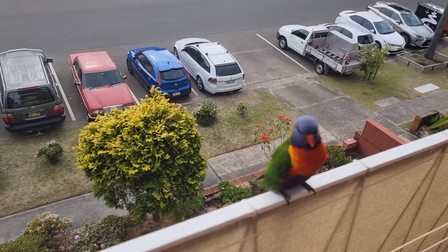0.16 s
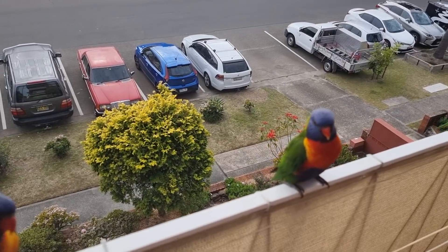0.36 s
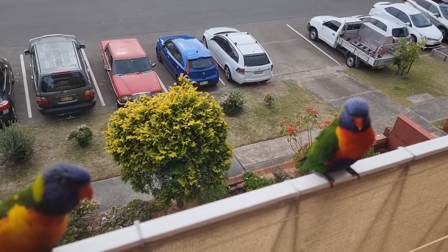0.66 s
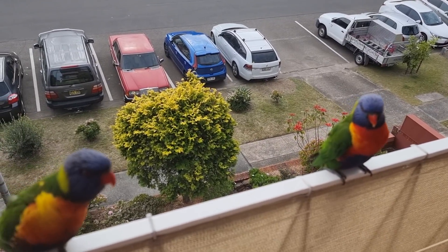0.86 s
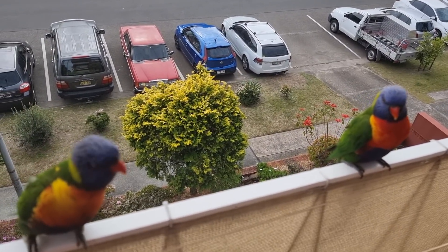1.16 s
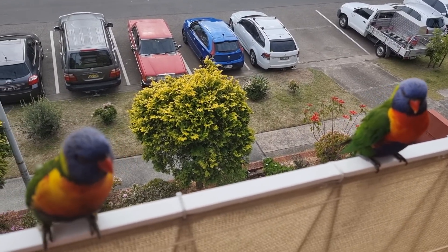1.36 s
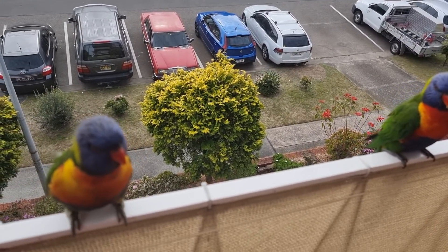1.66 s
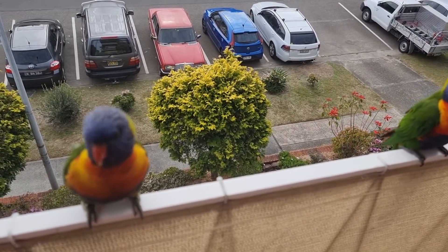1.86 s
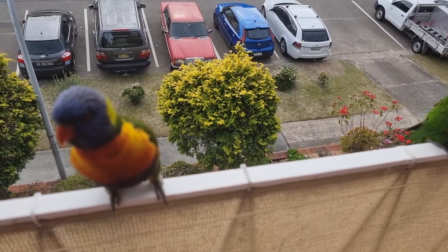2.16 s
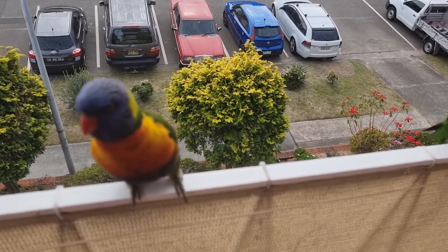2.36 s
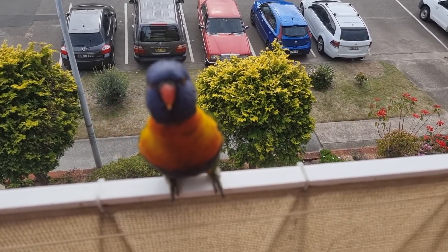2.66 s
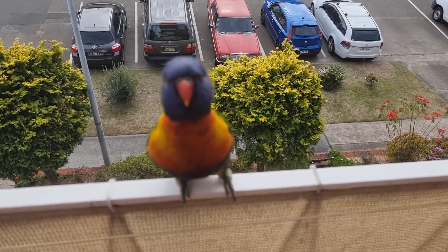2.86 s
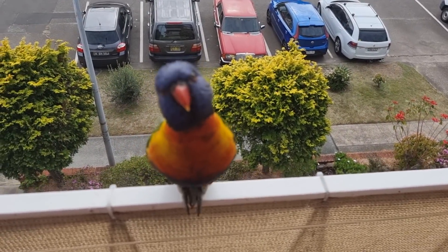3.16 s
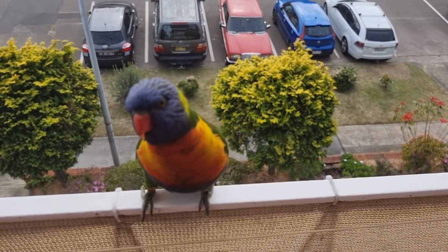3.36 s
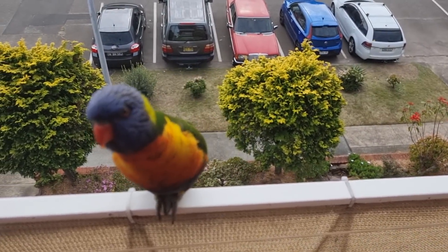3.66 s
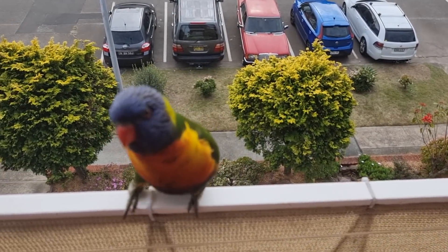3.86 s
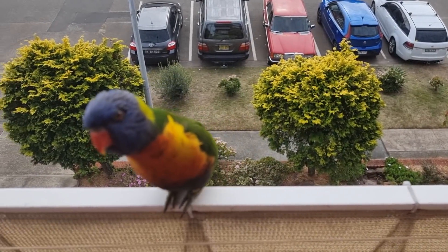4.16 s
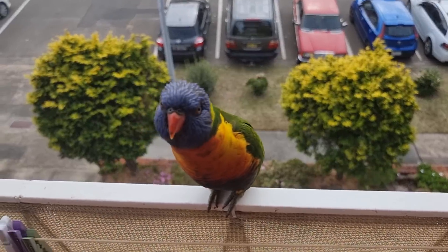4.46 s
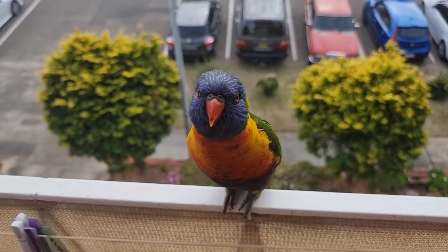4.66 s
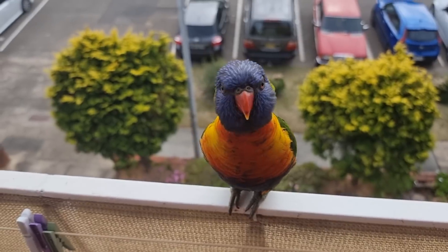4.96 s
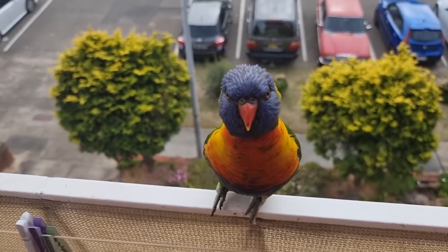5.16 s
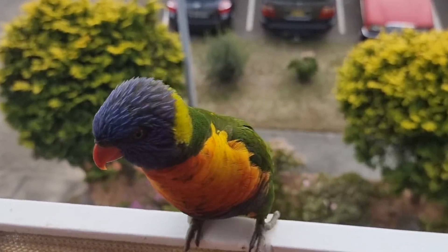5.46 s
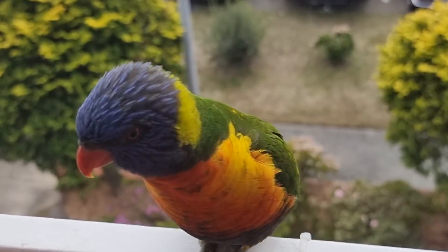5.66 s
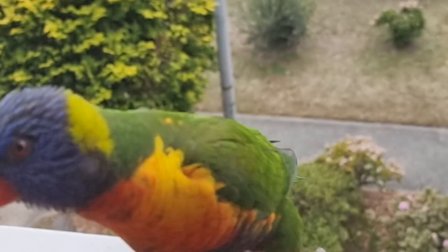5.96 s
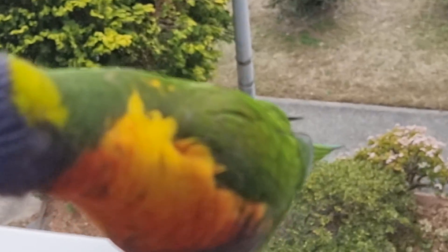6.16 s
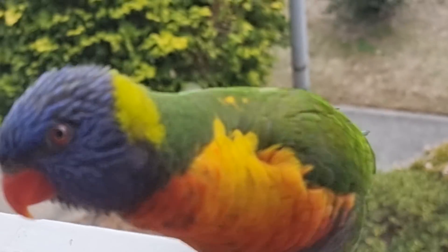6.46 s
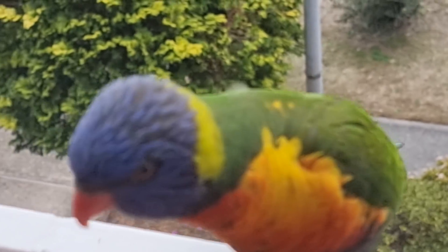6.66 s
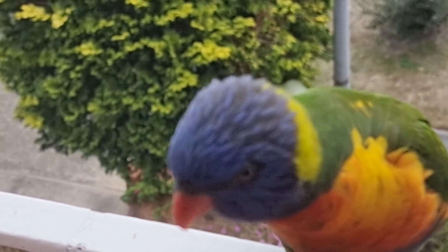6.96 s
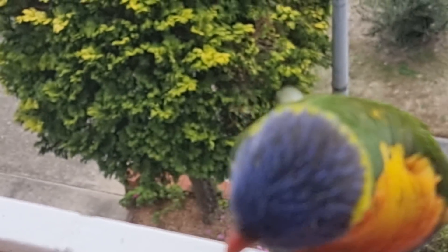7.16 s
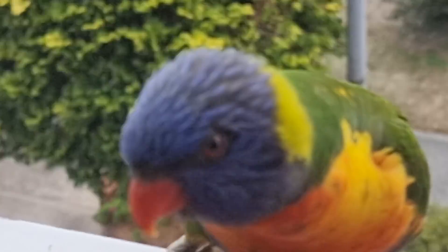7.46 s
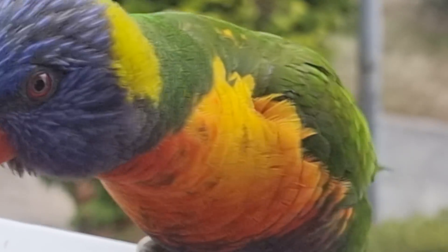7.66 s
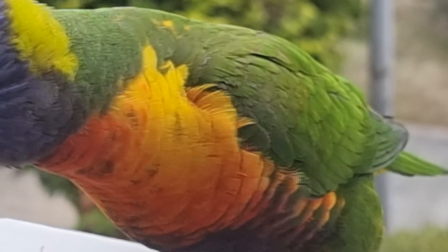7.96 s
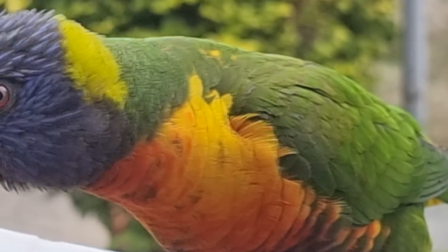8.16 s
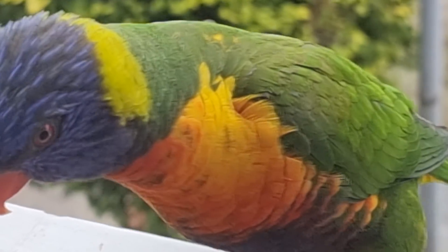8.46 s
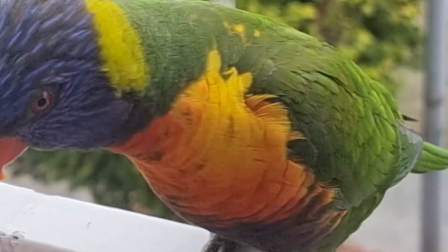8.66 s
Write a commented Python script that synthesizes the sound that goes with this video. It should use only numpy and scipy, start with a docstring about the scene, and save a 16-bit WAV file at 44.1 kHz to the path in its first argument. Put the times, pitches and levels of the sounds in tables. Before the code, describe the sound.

Outdoors on a balcony, a close lorikeet bursts into short, jumping whistled warbles while other birds squawk roughly, some fainter and further along the rail. Mid-way come a raspy squawk, a falling shriek and a strong double squawk, then weak chatter, another warble and a sharp claw tap. A stereo handheld microphone catches soft traffic, building hum and low wind buffets.

```python
"""Lorikeets on a balcony rail warble in clean, jumping whistles: membrane partials filtered by a throat.
Other calls squawk, shriek and chatter: odd partials of a doubled period, pitch jitter, flutter and breath noise.
Filtered noise bursts make claw taps on the rail, and decaying noise responses echo them and the birds.
Wind and the town are shaped noise; building fans and a thin insect are slightly wavering sine tones.
Two microphone ports hear the birds and taps with their own delays and levels."""
import sys
import numpy as np
from scipy import signal
from scipy.fft import rfft, irfft, next_fast_len
from scipy.io import wavfile
from scipy.ndimage import uniform_filter1d

SR = 44100
rng = np.random.default_rng(int(sys.argv[2]) if len(sys.argv) > 2 else 0)


def waveform_to_disk(signal):
    """Save audio, clipped to [-1, 1], as 16-bit WAV at the path in sys.argv[1]."""
    frames = np.transpose(np.atleast_2d(signal))
    scaled = np.clip(frames, -1, 1) * 32767
    samples = np.round(scaled).astype(np.int16)
    wavfile.write(sys.argv[1], SR, samples)


N = 388521
TOP_HZ = 15750  # upper edge of the pass band


def warbles(near):
    """Source-filter whistles: a gliding membrane pitch whose fast turns add roughness."""
    # upper register, one list per warble: time_s, pitch_hz, level_db
    warble_tracks = [
        [(0.494, 1977, -48), (0.501, 2080, -23.5), (0.522, 2036, -29.5), (0.534, 2114, -24.5),
         (0.548, 2080, -19.5), (0.56, 1834, -23.5), (0.588, 2090, -21.5), (0.598, 2213, -26),
         (0.627, 2016, -24), (0.634, 2057, -20.5), (0.645, 2076, -26.5), (0.664, 1845, -24),
         (0.677, 2100, -27.5), (0.701, 2112, -29.5), (0.719, 2090, -44)],
        [(2.294, 2050, -54), (2.299, 2055, -30.5), (2.335, 2087, -28.5), (2.344, 2054, -32), (2.351, 2144, -31),
         (2.356, 2087, -46), (2.368, 2156, -19), (2.395, 2130, -36), (2.405, 2210, -27), (2.409, 2155, -52),
         (2.436, 2031, -22.5), (2.454, 2026, -26.5), (2.483, 1947, -20.5), (2.514, 2060, -31),
         (2.529, 2070, -69)],
        [(3.404, 1502, -40), (3.409, 1508, -29), (3.419, 2050, -19.5), (3.422, 2043, -32.5), (3.425, 1922, -20),
         (3.436, 1933, -15), (3.466, 2067, -18), (3.477, 2120, -21.5), (3.491, 2100, -18.5),
         (3.547, 2138, -18.5), (3.562, 2160, -22), (3.608, 2136, -26), (3.614, 2160, -51)],
        [(7.47, 1900, -56), (7.479, 1864, -26.5), (7.507, 1936, -28.5), (7.517, 2186, -25), (7.521, 2030, -27),
         (7.543, 2240, -23), (7.575, 2160, -20), (7.585, 2006, -20.5), (7.612, 2017, -18), (7.629, 1972, -24.5),
         (7.656, 1964, -22), (7.674, 2010, -29), (7.695, 1950, -75)],
    ]
    # voice of each warble: left_lag_ms, left_minus_right_db, base_roughness (0-1), base_tilt_db (per octave)
    warble_voices = [(-.32, -1, 0.01, -4.5), (-.3, -1, 0.08, -3.5), (-.32, -2.5, 0.01, -0.5),
                     (-.23, 1, 0.03, 0.9)]
    dull_per_db = 0.41  # tilt lost for each dB of level lost
    for table, (lag_ms, pan_db, rough, tilt_db) in zip(warble_tracks, warble_voices):
        start, (hz, db) = columns(table)
        hz, db = flipped(start, hz, db)
        # the base tilt holds 5.5 dB under the loudest moment
        tilt_db = tilt_db + dull_per_db * np.maximum(db - db.max() + 5.5, -12)
        hz = uniform_filter1d(hz, 30)  # the membranes cannot turn at once
        turn = uniform_filter1d(np.abs(np.gradient(hz)), 700)  # Hz per sample
        rough = rough + 0.18 * np.tanh(turn / 0.77)
        voice = syrinx(hz, rough, odd_db=0, tilt_db=tilt_db, flutter_hz=200, flutter=0,
                       throat=whistle_throat, breath_db=-2, jitter=0.3, shimmer_db=4)
        add(near, start, undb(db) * voice, lag_ms, pan_db)


def shriek(near):
    """Amplitude and frequency modulation: a falling whistle whose flutter fades as it grows louder."""
    start = 4.594  # s
    on, gain = effort(attack_ms=14, hold_ms=149, release_ms=18.7)
    hz, db = flipped(start, between(1783, 1620, on), between(-26.5, -21.5, on))
    flutter = np.clip(between(0.56, 0.045, on ** 1.4), 0, 1)
    voice = syrinx(hz, 0.31 * flutter, odd_db=0, tilt_db=-5.0, flutter_hz=246, flutter=flutter,
                   throat=whistle_throat, breath_db=5.1, jitter=0.33, shimmer_db=16.0)
    add(near, start, gain * undb(db) * voice, lag_ms=-0.2, pan_db=-6.5)


def squawks(near, far):
    """Period doubling: odd partials of the doubled period sound between the even ones, roughened by jitter."""
    # one row per call: start_s, attack_ms, hold_ms, release_ms, first_level_db, last_level_db,
    # first_pitch_hz, last_pitch_hz (of the doubled period), first_roughness, last_roughness (0-1),
    # odd_partials_db, full_effort_tilt_db (per octave), left_lag_ms, left_minus_right_db,
    # flutter_hz, flutter_depth (0-1), beak_resonance_hz, beak_lift_db
    calls = [ (0.0, 1.5, 112, 23.3, -40.5, -44.5, 836, 791.5, 0.73, 0.72, -2.5, 0.7, 0.36, -7.5, 121, 0.83, 6640, -9),
             (0.43, 60, 6, 6, -40, -46, 720, 725, 0.95, .9, -4, -1.5, -0.48, -5, 153, 0.4, 1070, 25),
             (0.795, 37.5, 365, 45, -46, -36, 802, 724, 0.76, 0.73, -0.5, 3.5, 0.45, -5.5, 139.9, 0.81, 2760, 5),
             (2.9, 220, 175, 70, -38.5, -36, 762.4, 790, 0.91, 1, -5.5, 2, 0.5, -6, 259.4, 0.36, 4600, 4.5),
             (4.022, 19.5, 141, 28, -25, -27.5, 790, 772, 0.74, 0.59, -4, 3.8, -0.31, -2, 245.5, 0.56, 2360, 8.5),
             (5.05, 18.8, 505, 65, -53, -45, 820, 822, 0.98, 0.71, -1.5, 4, .64, -8.5, 340, 0.49, 6100, 0.5),
             (5.88, 60, 108, 8, -34.5, -33, 716, 714, .55, 0.44, 5.5, 5.5, -.52, -4.5, 203.4, 0.091, 2200, 1),
             (6.04, 55, 170, 21.4, -27, -23, 764, 780, 0.93, .52, -2, 5, -0.29, -4.5, 189.8, 0.14, 2380, 4.5),
             (6.33, 166, 14.5, 21, -49, -46.5, 752, 755, 0.91, 0.95, -1, 4.5, 0.37, -6.5, 56.3, .08, 5130, 5),
             (6.549, 3.3, 137, 13.3, -40.5, -48.5, 819, 800, 0.345, 0.97, -3, 3.5, .36, -4, 55, 0.098, 5000, 9),
             (6.683, 15, 111, 14, -43.5, -47.5, 811, 774, 0.55, .85, -0.5, 3.5, .36, -6, 56.5, .08, 5000, 9.5),
             (6.84, 8.6, 84, 80, -46.5, -50.5, 699, 724, 0.79, 0.81, -2, 3.5, 0.37, -3, 57.5, 0.07, 5100, 6.5),
             ]
    # throat of the near birds: frequency_hz, gain_db
    near_throat = [(320, -58), (550, -25), (770, 2), (862, -10.5), (951, 3), (1220, -2.5), (1550, 1.5),
                   (1860, -8.5), (3050, -9.5), (3870, -12), (5890, -33.5), (12800, -52), (15700, -52)]
    # throat of the birds further along the rail: frequency_hz, gain_db
    far_throat = [(320, -40.5), (550, -22.5), (607, -12), (749, 0.5), (1020, -6.5), (1260, 1), (1390, 1.5),
                  (2120, -7), (2270, -14.5), (3180, -13), (3760, -18), (4910, -19.5), (5980, -32),
                  (7690, -33), (11300, -54.5), (12800, -48), (15700, -58)]
    pitch_spread, level_spread_db, wander_hz = 0.025, 1.5, 25
    dull_per_db = 0.43  # tilt lost for each dB under full effort
    for (start, attack_ms, hold_ms, release_ms, first_db, last_db, first_hz, last_hz, first_rough, last_rough,
         odd_db, tilt_db, lag_ms, pan_db, flutter_hz, flutter, beak_hz, beak_db) in calls:
        on, gain = effort(attack_ms, hold_ms, release_ms)
        hz = between(first_hz, last_hz, on) * (1 + pitch_spread * wander(len(on), wander_hz))
        rough = np.clip(between(first_rough, last_rough, on), 0.3, 1)
        db = between(first_db, last_db, on) + level_spread_db * wander(len(on), wander_hz)
        effort_db = np.maximum(20 * np.log10(gain), -30)
        tilt_db = tilt_db + dull_per_db * (db - max(first_db, last_db) + effort_db)
        perch, colour = (near, near_throat) if lag_ms < 0 else (far, far_throat)
        throat = lambda q: at_hz(colour, q) + beak_db * np.abs(peak(q, beak_hz, 0.74 * beak_hz)) ** 2
        voice = syrinx(hz, rough, odd_db, tilt_db, flutter_hz, flutter, throat,
                       breath_db=-5, jitter=0.11, shimmer_db=2.5)
        add(perch, start, gain * undb(db) * voice, lag_ms, pan_db)


def far_peep(far):
    """Phase accumulation: a small whistle with one upward leap, made as a single gliding sine."""
    # time_s, pitch_hz, peak_level_db
    peep_track = [(1.38, 1410, -75), (1.4, 1394, -52), (1.44, 1395, -54), (1.45, 1680, -41),
                  (1.48, 1630, -76)]
    start, (hz, db) = columns(peep_track)
    add(far, start, undb(db) * np.sin(2 * np.pi * np.cumsum(hz) / SR), lag_ms=0.2, pan_db=-1)


def birds():
    """Superposition of all calls: the near birds, and those further along the rail."""
    # brief dips in the level of the far birds: time_s, half_length_ms, level_change_db
    dips = [(5.135, 24, -7.5), (5.21, 11, -10)]
    near, far = np.zeros((2, 2, N))
    warbles(near)
    shriek(near)
    squawks(near, far)
    far_peep(far)
    return near, far * undb(sum(db * bump(s, half_ms) for s, half_ms, db in dips))


def flipped(start, hz, db):
    """Register jumps: the pitch and level of a whistle glide to another note, mostly lower, and back."""
    # time_s, held_ms, glide_ms, first_pitch_hz, last_pitch_hz, level_db
    flips = [(0.527, 0.28, 3.9, 1703, 1703, -26.5), (0.570, 14, 3.1, 1645, 1712, -20),
             (0.607, 14.2, 4.77, 1671, 1695, -22), (0.622, 0.6, 3.7, 1510, 1520, -21),
             (0.651, 9.84, 4.3, 1556, 1630, -24), (2.340, 0.3, 3.95, 1730, 1723, -25),
             (2.360, 1.43, 4.15, 1710, 1670, -21), (2.37, 18.8, 4, 1843, 1640, -22.5),
             (2.416, 12, 4.8, 1710, 1757, -25.5), (2.431, 1.4, 2.64, 1575, 1584, -22),
             (2.464, 9.1, 9.7, 1632, 1673, -23.5), (3.472, 0.2, 4.8, 1852, 1864, -14),
             (3.501, 21.6, 8.8, 1922, 1920, -21), (3.526, 0.3, 4.5, 1740, 1706, -20),
             (3.579, 0.31, 21, 1836, 1846, -18), (4.651, 0.32, 8.7, 1647, 1627, -21.5),
             (4.666, 0.27, 9, 1930, 1933, -21.5), (4.69, 3.8, 8.5, 1798, 1785, -21),
             (4.745, 2.2, 11, 1890, 1870, -24.5), (7.527, 8.1, 7.6, 1940, 1771, -23),
             (7.547, 3.3, 4.3, 1907, 1870, -22.5), (7.554, 15.6, 3.7, 1656, 1672, -20.5),
             (7.592, 12.7, 5.3, 1723, 1655, -22.5), (7.607, 1.6, 3.7, 1473, 1556, -20.5),
             (7.635, 15, 4, 1556, 1672, -25)]
    for s, held_ms, glide_ms, first_hz, last_hz, flip_db in flips:
        ms = (start - s + np.arange(len(hz)) / SR) * 1000
        away = np.clip(np.minimum(ms + glide_ms, held_ms + glide_ms - ms) / glide_ms, 0, 1)
        note_hz = between(first_hz, last_hz, np.clip(ms / held_ms, 0, 1))
        hz = between(hz, note_hz, away)
        db = between(db, flip_db, away)
    return hz, db


def whistle_throat(hz):
    """Vocal-tract resonance: the gain in dB that the throat gives a whistle at each frequency."""
    # frequency_hz, gain_db
    resonances = [(820, -28.5), (1400, -3), (2120, 1), (3280, -7.5), (4010, -3), (4620, -10), (6020, -26),
                  (8070, -21.5), (9390, -32.5), (12500, -33.5), (15700, -38)]
    return at_hz(resonances, hz)


def syrinx(hz, rough, odd_db, tilt_db, flutter_hz, flutter, throat, breath_db, jitter, shimmer_db):
    """Source-filter voice: membrane partials through the throat; roughness adds jitter, shimmer and breath."""
    count = len(hz)
    # a second, slower oscillation squeezes the airflow and pulls the pitch with it
    beat_hz = flutter_hz * (1 + 0.06 * wander(count, 44.2))
    beat = np.sin(2 * np.pi * np.cumsum(beat_hz) / SR)
    slip = wander(count, 600) + 0.3 * wander(count, 45)  # quick shake and slower slips
    f = hz * (1 + jitter * rough ** 2 * slip + 0.13 * flutter * beat)
    phase = 2 * np.pi * np.cumsum(f) / SR
    tone, power = np.zeros(count), np.zeros(count)
    for k in range(1, 21):
        patchy_db = 3 * rough * wander(count, 70)  # a rough voice drops and regains each partial on its own
        slope_db = tilt_db * np.log2(k * hz / 1800)
        gain = undb(throat(k * f) + patchy_db + odd_db * (k % 2) + slope_db) * (k * f < TOP_HZ)
        tone += gain * np.cos(k * phase)
        power += gain ** 2 / 2
    # air hisses brighter than the tone
    hiss = rng.standard_normal(count)
    breath = unit(shaped(hiss, lambda q: undb(throat(q)) * (q / 2000) ** 0.6))
    voice = tone / np.sqrt(uniform_filter1d(power, 400)) + rough * undb(breath_db) * breath
    shimmer = undb(shimmer_db * rough * wander(count, 640))
    return unit(voice * np.exp(1.42 * flutter * beat) * shimmer)


def effort(attack_ms, hold_ms, release_ms):
    """Amplitude envelope: progress 0-1 through the hold, and the gain that swells before it and dies after."""
    ms = np.arange(0, attack_ms + hold_ms + release_ms, 1000 / SR)
    gain = np.minimum(ms / attack_ms, 1) * np.clip((ms[-1] - ms) / release_ms, 0, 1) ** 1.5
    return np.clip((ms - attack_ms) / hold_ms, 0, 1), gain + 0.00097  # the floor keeps its logarithm finite


def claws():
    """Impact excitation: short, decaying noise scratches ring the damped resonances of the rail."""
    # start_s, peak_level_db
    taps = [(4.294, -50.5), (6.49, -38), (7.914, -31), (7.925, -25)]
    # resonances of the rail: centre_hz, width_hz, relative_level_db
    rail_modes = [(1180, 90, -4), (2200, 1300, 0), (4500, 2000, -12), (10000, 5000, -17)]
    out, t = np.zeros((2, N)), np.arange(2000) / SR
    for start, db in taps:
        scratch = rng.standard_normal(len(t)) * np.exp(-t / 0.0038)
        ring = shaped(scratch, lambda q: sum(undb(d) * peak(q, f, w) for f, w, d in rail_modes))
        add(out, start, undb(db) * ring / np.abs(ring).max(), lag_ms=-0.2, pan_db=-1)
    return out


def add(out, start_s, x, lag_ms, pan_db):
    """Interaural-style cues: delay and level place a sound between the ports, the phone's body shades one."""
    # response of the left port to sounds that reach it first: frequency_hz, gain_db, phase_rad
    body_shade = [(300, -6, 1), (810, 7, -0.31), (1970, -5.5, -1.13), (3880, 3, 0.14), (7000, 7, 0.62),
                  (12750, -1.5, -0.044)]
    x = x * np.minimum(np.arange(len(x)) / 130, 1)  # 3 ms fade-in
    hz, db, phase = np.transpose(body_shade)
    shade = lambda q: undb(np.interp(q, hz, db)) * np.exp(1j * np.interp(q, hz, phase))
    ports = (shaped(x, shade) if lag_ms < 0 else x, x)
    for side, sign in enumerate((1, -1)):
        i = int(SR * (start_s + max(sign * lag_ms, 0) / 1000))
        out[side, i:i + len(x)] += ports[side] * undb(sign * pan_db / 2)


def space(x, echo_db):
    """Reverberation: quick echoes off floor and walls, then the duller yard tail, unrelated at the two ports."""
    echo_decay_ms, yard_db, yard_t60_s = 14, -37, 0.7
    t = np.arange(int(0.8 * SR)) / SR
    early, late = rng.standard_normal((2, 2, len(t)))
    early = unit(early * np.exp(-t * 1000 / echo_decay_ms) * (t > 0.001))
    # short waves scatter most off rail and mesh
    early = shaped(early, lambda q: 2.27 * q / (q + 3500)) * undb(echo_db)
    late = shaped(late, lambda q: 1 / (1 + (q / 4500) ** 2))
    late = late * undb(-60 * t / yard_t60_s) * (t > 0.015)
    response = (early + unit(late) * undb(yard_db)) / np.sqrt(len(t))
    # the right port's unshaded sound feeds both responses
    return x + signal.fftconvolve(x[1:], response, axes=1)[:, :N]


def wind():
    """Turbulent pressure: low-frequency noise, unrelated at the two ports, swells with breeze and gusts."""
    # steady breeze: time_s, level_db
    breeze = [(0, -65), (1.6, -63), (2.4, -65), (3.5, -66.5), (4.5, -51), (5.5, -53), (6.6, -45.5),
              (7, -53), (8.81, -48)]
    # gusts: time_s, peak_level_db, half_length_ms
    gust_rows = [(0.32, -51, 97), (0.66, -43.5, 95), (0.92, -36, 48), (1.43, -49, 70), (1.91, -58, 31),
                 (3.04, -49, 180), (4.86, -44, 40), (5.0, -34, 51), (5.27, -57, 40), (7.43, -38.5, 41),
                 (7.61, -40.5, 86), (7.88, -43, 35), (8.11, -45, 47), (8.31, -38, 47), (8.7, -51, 52)]
    band = lambda q: (q / 40) ** 6 / (1 + (q / 40) ** 6) / (1 + (q / 88) ** 6)  # about 40-88 Hz
    rumble = shaped(rng.standard_normal((2, N)), band)
    gusts = sum(undb(db) * bump(s, half_ms) for s, db, half_ms in gust_rows)
    return unit(rumble) * (undb(over_time(breeze)) + gusts) * undb(1.5 * wander(N, 14))


def town():
    """Diffuse-field coherence: distant traffic is alike at both ports in the bass, unrelated in the treble."""
    # relative spectrum of the traffic: frequency_hz, density_db (per Hz)
    spectrum = [(18, -23.5), (31, -5), (45, -7), (120, -9), (170, -16), (250, -10.5), (470, -16),
                (770, -17.5), (1570, -27), (2500, -33.5), (3900, -40.5), (5500, -48), (8000, -49.5),
                (9600, -62), (13000, -61.5), (15700, -53)]
    # slow swell, used relative to its mean: time_s, level_db
    swell = [(0.0, -50), (2.38, -50), (3.12, -50), (4.71, -50), (5.57, -51), (5.94, -49.5), (8.24, -48),
             (8.81, -49)]
    # fans of the building: pitch_hz, waver_hz, level_db
    fans = [(142.2, 5.825, -54.5), (198.2, 2.45, -52.5), (278.5, 4.2, -60.5), (509.4, 6.43, -63)]
    traffic_db, left_lag_ms = -47.5, -0.5
    shared, own = rng.standard_normal(N), rng.standard_normal((2, N))
    alike = lambda q: np.clip(0.93 / (1 + (q / 1500) ** 2), 0, 1)
    both = shaped(shared, lambda q: undb(at_hz(spectrum, q)) * np.sqrt(alike(q)))
    each = shaped(own, lambda q: undb(at_hz(spectrum, q)) * np.sqrt(1 - alike(q)))
    traffic = unit(both + each) * undb(traffic_db)
    hum = sum(undb(db) * unit(wavering(hz, waver_hz, 24.75, 1.3)) for hz, waver_hz, db in fans)
    swell_db = over_time(swell)
    out = (traffic * undb(0.25 * wander(N, 5.8)) + hum) * undb(swell_db - swell_db.mean())
    out[0] = np.roll(out[0], int(left_lag_ms * SR / 1000))
    return out


def insect():
    """Stridulation as narrow-band tones: a thin far-off line and a fainter one above it."""
    # common level: time_s, level_db
    loudness = [(0, -93), (3.5, -108), (3.8, -91.5), (5, -90), (7.0, -98), (7.1, -82), (7.3, -73),
                (7.4, -79), (7.46, -89.5), (8.2, -89), (8.5, -84), (8.81, -80.5)]
    # lines: pitch_hz, relative_level_db
    lines = [(4990, 8), (8960, -10.5)]
    tones = sum(undb(db) * wavering(hz, 6, 25.7, 0.86) for hz, db in lines)
    return undb(over_time(loudness)) * tones


def wavering(hz, waver_hz, rate_hz, swing_db):
    """Random modulation: a sine whose pitch and level drift a little."""
    phase = 2 * np.pi * np.cumsum(hz + waver_hz * wander(N, rate_hz)) / SR
    return np.sin(phase) * undb(swing_db * wander(N, rate_hz))


def wander(count, rate_hz):
    """Low-pass noise: smooth chance of RMS 1 that changes about rate_hz times a second."""
    k = max(int(SR / rate_hz), 1)
    return unit(uniform_filter1d(uniform_filter1d(rng.standard_normal(count), k), k))


def bump(centre_s, half_ms):
    """Gaussian envelope: rises to 1 at its centre and falls to 1/e half_ms away."""
    ms = np.arange(N) * 1000 / SR
    return np.exp(-((ms - centre_s * 1000) / half_ms) ** 2)


def shaped(x, gain_at):
    """Linear filtering: multiply the spectrum by a gain that is a function of frequency."""
    size = next_fast_len(x.shape[-1])
    hz = np.arange(size // 2 + 1) * SR / size
    return irfft(rfft(x, size) * gain_at(hz), size)[..., :x.shape[-1]]


def peak(hz, centre_hz, width_hz):
    """Damped resonance: complex response of one mode."""
    return 1 / (1 + 2j * (hz - centre_hz) / width_hz)


def at_hz(table, hz):
    """Spectral interpolation: a (Hz, dB) table read on a log-frequency axis."""
    table_hz, table_db = np.transpose(table)
    return np.interp(np.log(np.maximum(hz, 1)), np.log(table_hz), table_db)


def over_time(table):
    """Linear interpolation of a (s, dB) table over the whole scene."""
    return np.interp(np.arange(N) / SR, *np.transpose(table))


def columns(table):
    """Linear interpolation of a call: its start time and every column, sample by sample."""
    s, *rest = np.transpose(table)
    t = np.arange(s[0], s[-1], 1 / SR)
    return s[0], [np.interp(t, s, c) for c in rest]


def between(first, last, share):
    """Linear interpolation from first to last."""
    return first + (last - first) * share


def undb(db):
    """Decibel law: amplitude ratio of a level."""
    return 10 ** (np.asarray(db) / 20)


def unit(x):
    """Normalisation to an RMS of 1."""
    return x / np.sqrt(np.mean(x ** 2))


def scene():
    """Superposition: birds and claws with their echoes, over wind, town and insect."""
    near, far = birds()
    return space(near + claws(), echo_db=-7) + space(far, echo_db=-1) + wind() + town() + insect()


def record(dry):
    """Band limiting: the phone cuts the top with a steep elliptic low-pass."""
    return signal.sosfilt(signal.ellip(10, 0.2, 70, TOP_HZ, fs=SR, output="sos"), dry)


dry = scene()
out = record(dry)
waveform_to_disk(out)
```